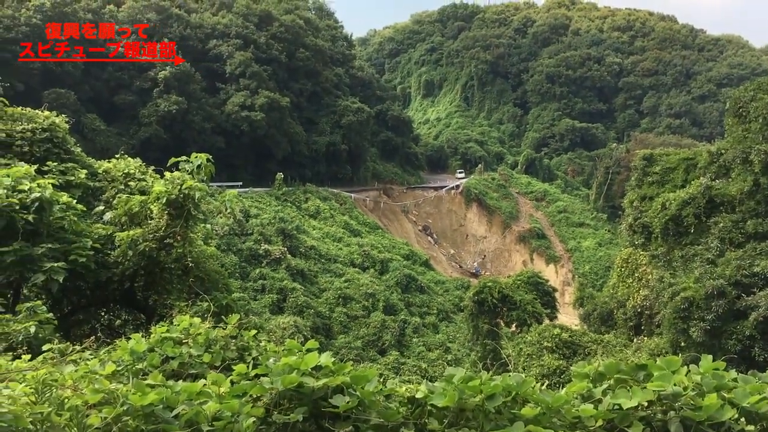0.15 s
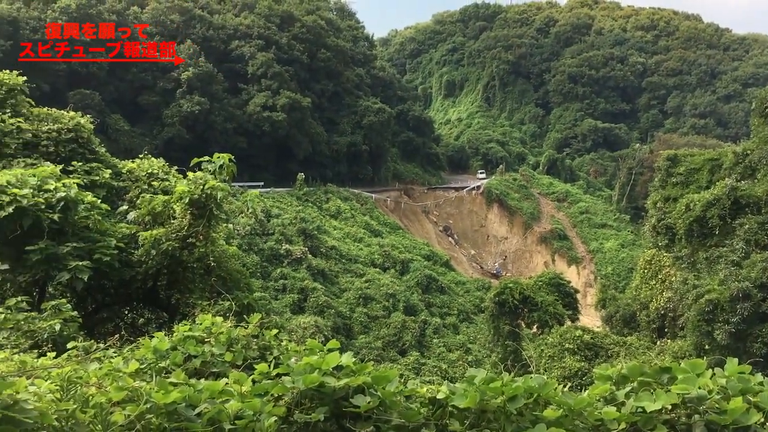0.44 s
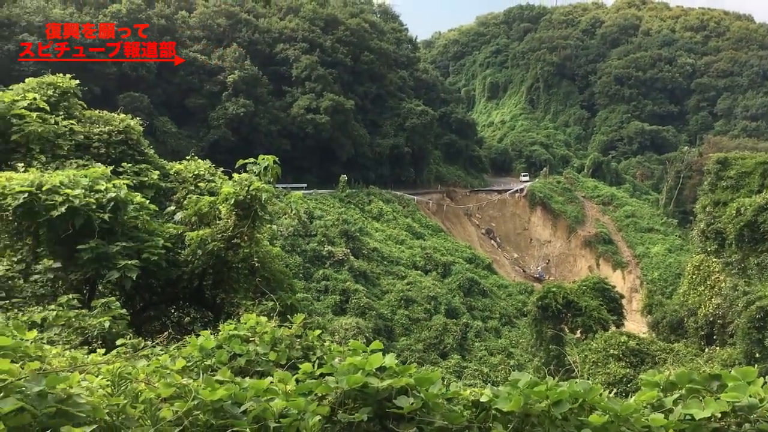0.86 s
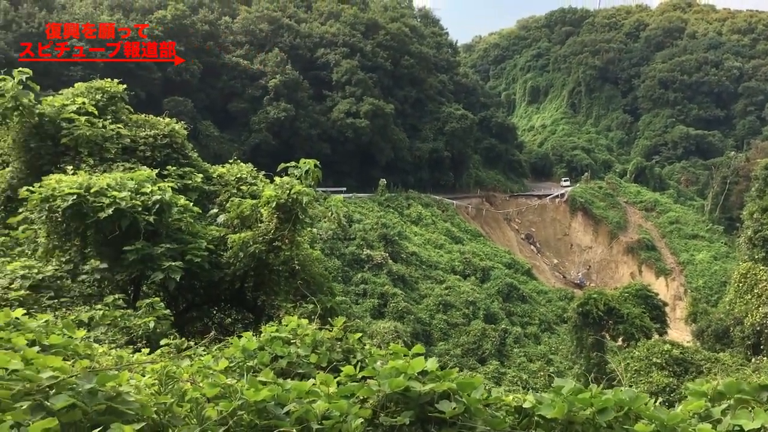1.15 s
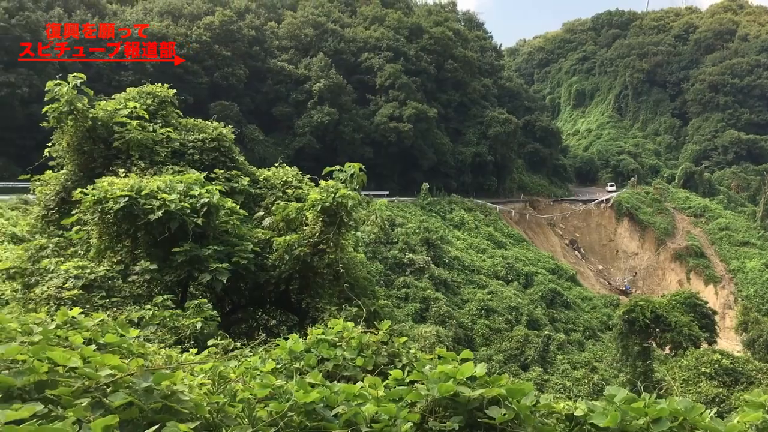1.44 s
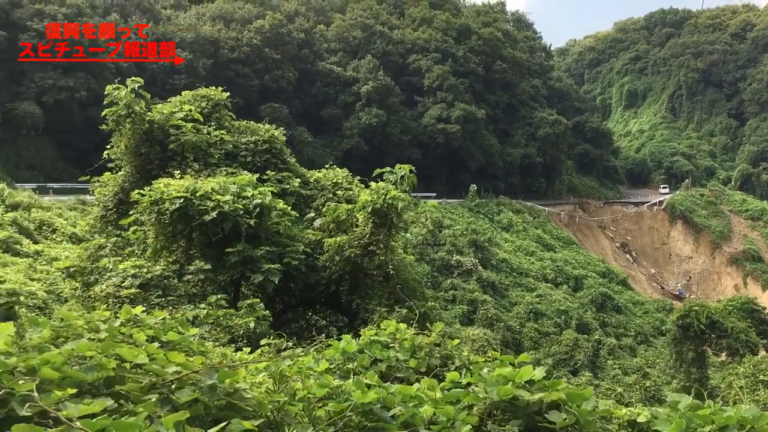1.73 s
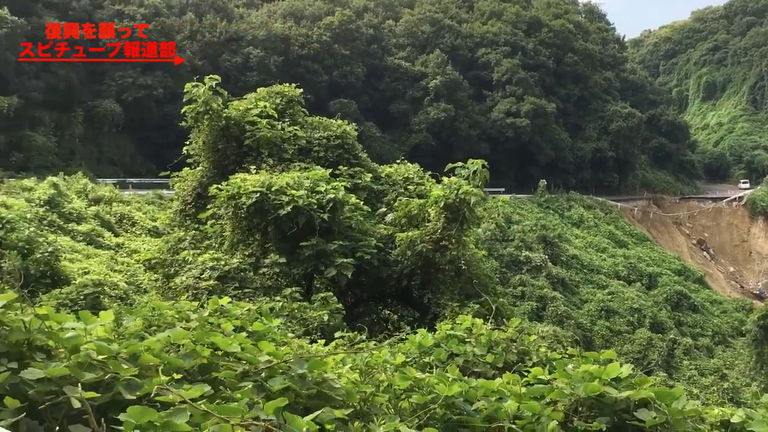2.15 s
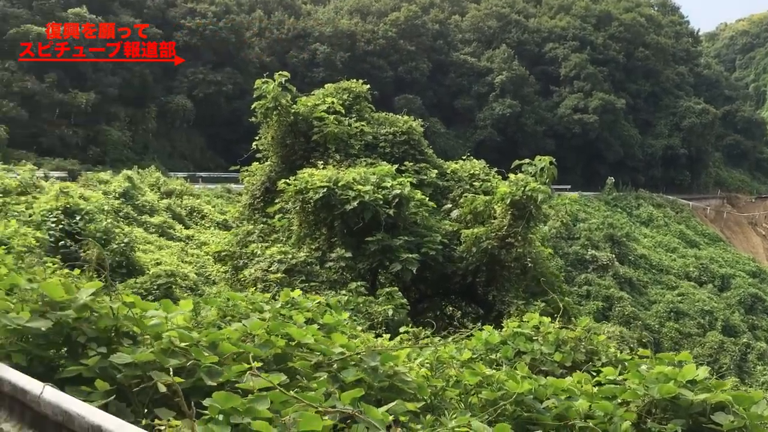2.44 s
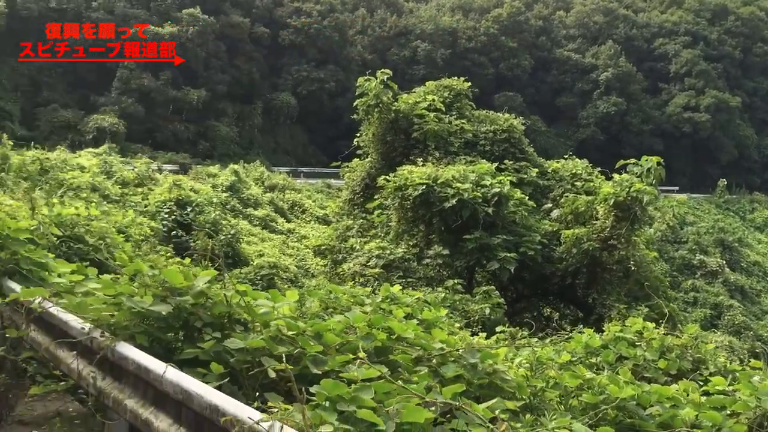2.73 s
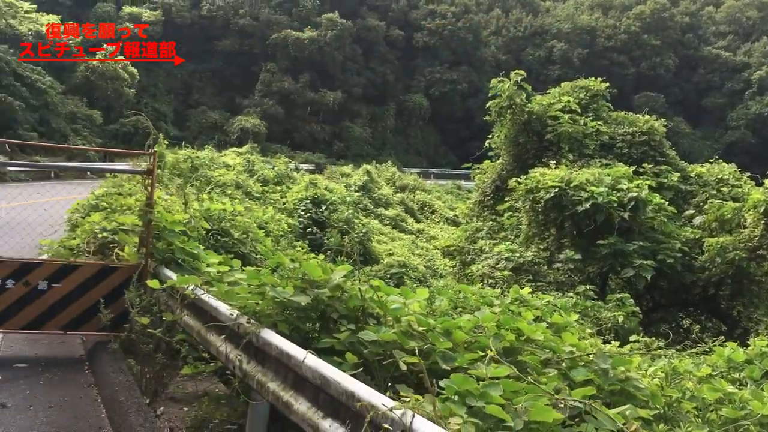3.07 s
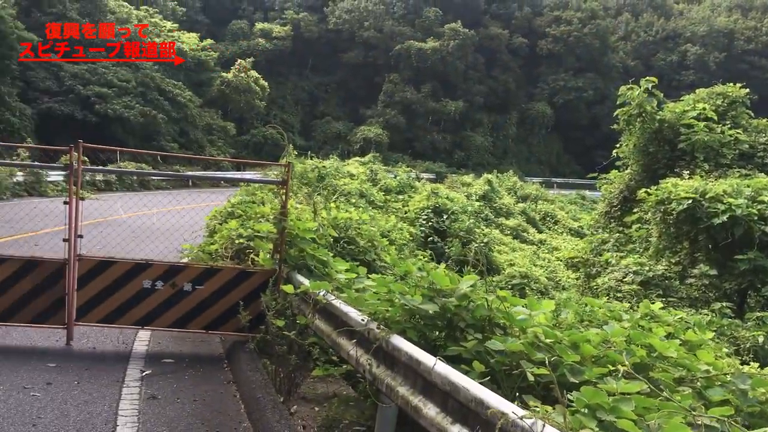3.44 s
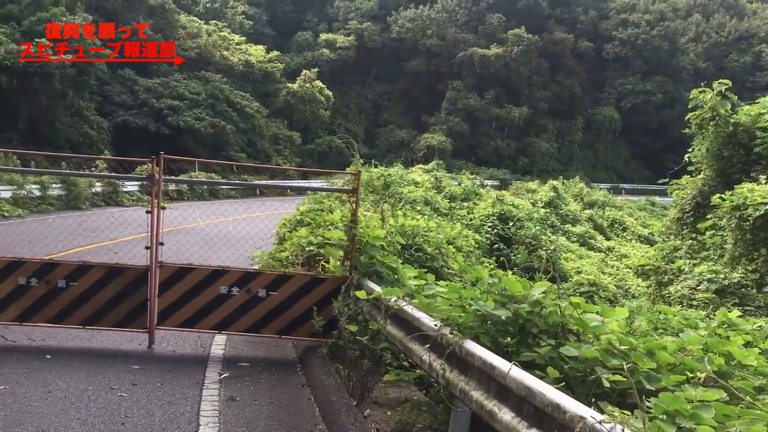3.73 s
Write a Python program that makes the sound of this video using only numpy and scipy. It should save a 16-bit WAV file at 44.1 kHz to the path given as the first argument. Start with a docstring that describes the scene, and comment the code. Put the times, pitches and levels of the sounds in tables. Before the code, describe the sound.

A cicada chorus sizzles continuously outdoors among trees, with thin whines and tiny chirps inside it. A closer singer swells in the second half, while faint taps occur near the single microphone above a weak rumble.

```python
"""Cicadas on a wooded hillside

Many far singers blur into a bright hiss, one near singer buzzes through it, and a few whine. Brief chirps fleck
a deeper wash, higher-pitched insects swell in waves, and below lie a low rumble, a faint hum and soft taps.
The singers are click trains, smeared by echoes or ringing a small body; whines and hum are narrow-band noise,
the rumble is filtered noise, chirps are rising sines, and taps are damped sines. One microphone hears it all."""
import sys
import numpy as np
from scipy import signal
from scipy.fft import rfft, irfft
from scipy.io import wavfile

SR = 44100
rng = np.random.default_rng(int(sys.argv[2]) if len(sys.argv) > 2 else 0)


def wrap_up_sound(samples):
    """Save the sound to the file named by the first command line argument, as 16-bit audio."""
    columns = np.atleast_2d(samples).T
    # keep every value between -1 and 1, then stretch to whole-number steps
    tamed = np.clip(columns, -1, 1)
    steps = np.round(tamed * 32767).astype(np.int16)
    wavfile.write(sys.argv[1], SR, steps)


N = 171990
CHORUS_CLICKS_PER_S = 480   # mean rate in the far chorus and the deeper wash


def amp(db):
    """Level law: a gain is ten to the power of decibels over twenty."""
    return 10 ** (np.asarray(db) / 20)


def rms_one(x):
    """Normalisation: division by the root mean square gives unit rms."""
    return x / np.sqrt(np.mean(np.abs(x) ** 2) + 1e-20)


def level(rows):
    """Amplitude envelope: gain over time, with decibels interpolated between (time_s, level_db) rows."""
    time_s, level_db = np.transpose(rows)
    return amp(np.interp(np.arange(N) / SR, time_s, level_db))


def colour(x, spectrum):
    """Linear filtering: weight each frequency by the tabled curve, almost nothing outside it; rms 1."""
    curve_hz, curve_db = np.transpose(spectrum)
    freq_hz = np.arange(len(x) // 2 + 1) * SR / len(x) + 1e-3   # the offset avoids log(0)
    gain_db = np.interp(np.log(freq_hz), np.log(curve_hz), curve_db, left=-99, right=-99)
    return rms_one(irfft(rfft(x) * amp(gain_db), len(x))[:N])


def slow(width_hz):
    """Narrow-band noise: a two-pole resonance at zero frequency smooths complex noise; rms 1."""
    pole = np.exp(-np.pi * width_hz / SR)
    noise = rng.standard_normal(N + SR) + 1j * rng.standard_normal(N + SR)
    smooth = signal.lfilter([1], [1, -2 * pole, pole * pole], noise)
    return rms_one(smooth[SR:])   # the filter settles during the discarded first second


def rings(start_s, gain, hz, t60_s):
    """Damped oscillation: each strike starts a sine that falls by 60 dB in t60_s."""
    start = np.floor(start_s * SR).astype(int)
    out = np.zeros(N + SR)
    span = np.arange(1, int(t60_s * SR) + 2)
    index = start[:, None] + span
    since_s = index / SR - start_s[:, None]   # keeps strike times finer than one sample
    ring = np.sin(2 * np.pi * hz * since_s) * amp(-60 * since_s / t60_s)
    np.add.at(out, index, gain[:, None] * ring)
    return out[:N]


def crowd(clicks_per_s, spectrum, throb_db, throb_hz, count):
    """Incoherent superposition: ragged click trains, each with its own pitch region, throb and echo path."""
    rate_spread = .12    # between singers, share of the mean rate
    woods_t60_s = .12    # blur of echoes among the trees
    echo_s = np.arange(SR // 2) / SR
    freq_hz = np.arange(1, N // 2 + 2) * SR / N
    edges_hz = [spectrum[1][0], spectrum[-2][0]]
    place = count * np.interp(np.log(freq_hz), np.log(edges_hz), [0, 1])   # position along the pitch regions
    total = 0
    for k in range(count + 1):
        rate = clicks_per_s * (1 + rate_spread * rng.standard_normal())
        throb = amp(throb_db * slow(throb_hz).real)
        clicks = (rng.random(N) < rate / SR) * throb
        echoes = rng.standard_normal(len(echo_s)) * amp(-60 * echo_s / woods_t60_s)
        path = rfft(echoes, N)
        smear = path / np.abs(path)   # phase alone: echoes smear but do not colour
        region = np.cos(np.pi / 2 * np.clip((place - k) / 2, -1, 1))   # overlaps its neighbours
        total = total + rfft(rms_one(clicks)) * smear * region
    return colour(irfft(total, N), spectrum)


def rumble():
    """Filtered broadband noise: a low-pitched spectrum, as of far wind or traffic."""
    # Rumble spectrum: freq_hz [Hz], density_db [dB per Hz, relative]
    rumble_spectrum = [(16, -38), (28, -3.5), (49, 0.5), (70, 2.5), (173, -11), (241, -10.5), (475, -22.5),
                       (692, -24.5), (785, -27.5), (1200, -37), (1560, -36), (2640, -120)]
    return amp(-62) * colour(rng.standard_normal(N), rumble_spectrum)


def hum():
    """Amplitude and phase modulation: slow complex noise makes each faint tone waver."""
    # Hum tones: pitch_hz [Hz], level_db [dB, rms of the complex tone; its real part lies about 3 dB lower]
    hum_tones = [(237, -83), (708, -90)]
    width_hz = 3.8
    t = np.arange(N) / SR
    out = 0
    for pitch_hz, level_db in hum_tones:
        tone = np.exp(2j * np.pi * pitch_hz * t)
        out = out + amp(level_db) * (slow(width_hz) * tone).real
    return out


def taps():
    """Impulse response of damped modes: soft hollow taps near the microphone, a short ring over a duller thud."""
    # Taps: start_s [s], level_db [dB, ring amplitude before decay], pitch_hz [Hz], t60_s [s]
    tap_rows = [(1.030, -54, 960, .035), (2.335, -58, 1100, .008), (2.345, -63, 880, .04),
                (2.401, -58, 950, .008), (2.776, -57, 950, .008), (3.009, -54, 1280, .03),
                (3.132, -58, 1250, .01), (3.184, -54, 1080, .012), (3.299, -50, 1010, .016)]
    thud_hz, thud_t60_s, thud_db = 650, 0.0092, -6.5   # thud level is relative to the ring
    out = 0
    for start_s, level_db, pitch_hz, t60_s in tap_rows:
        start = np.array([start_s])
        ring = rings(start, amp([level_db]), pitch_hz, t60_s)
        thud = rings(start, amp([level_db + thud_db]), thud_hz, thud_t60_s)
        out = out + ring + thud
    return out


def deep_wash():
    """Superposed click trains in a lower band: probably larger singers further off."""
    # Wash spectrum: freq_hz [Hz], density_db [dB per Hz, relative]
    wash_spectrum = [(530, -47), (900, -23.5), (1180, -20), (1460, -4), (1740, -0.5), (2320, 0), (2930, -6),
                     (3910, -4), (4800, -10), (5200, -11.5), (6760, -29), (11400, -120)]
    # Wash envelope: time_s [s], level_db [dB, rms]
    wash_level = [(0.0, -52), (0.44, -55), (0.51, -52), (0.81, -54.5), (1.05, -53), (2.3, -53), (2.39, -54),
                  (2.43, -52), (3.42, -52.5), (3.9, -51)]
    wash = crowd(CHORUS_CLICKS_PER_S, wash_spectrum, throb_db=2.5, throb_hz=10.1, count=20)
    return level(wash_level) * wash


def flecks():
    """Frequency sweep: brief rising chirps scattered through the deeper wash, like trickling water."""
    # Clearest flecks: centre_s [s], pitch_hz [Hz, at the centre], level_db [dB, peak]
    clear_flecks = [(.55, 2080, -54), (.618, 2600, -54), (.878, 2150, -53), (1.65, 1880, -55),
                    (3.1, 2100, -55)]
    per_s, length_s = 40, .04
    loudest_db, range_db = -60, 10   # random flecks lie up to range_db below the loudest
    low_hz, high_hz = 1460, 2712     # centre pitches of the random flecks
    rise = 0.105                     # sweep either side of the centre pitch, share
    draw = rng.random((400, 3))
    random_s = np.cumsum(-np.log(1 - draw[:, 0])) / per_s   # exponential waits between flecks
    random_hz = low_hz * (high_hz / low_hz) ** draw[:, 1]
    random_db = loudest_db - range_db * draw[:, 2]
    random_flecks = np.transpose([random_s, random_hz, random_db])[random_s < N / SR]
    out = np.zeros(N + SR)
    u = np.linspace(-1, 1, int(length_s * SR))   # from start to end of one fleck
    for centre_s, pitch_hz, level_db in np.vstack([clear_flecks, random_flecks]):
        start = max(int(centre_s * SR) - len(u) // 2, 0)
        phase = 2 * np.pi * np.cumsum(pitch_hz * (1 + rise * u)) / SR
        out[start:start + len(u)] += amp(level_db) * (1 - u ** 2) ** 2 * np.sin(phase)
    return out[:N]


def high_insects():
    """Superposition under a moving envelope: higher-pitched click trains swell in waves."""
    # High spectrum: freq_hz [Hz], density_db [dB per Hz, relative]
    high_spectrum = [(9500, -29), (10700, -9.5), (11500, -1.5), (13000, 1), (14500, 0), (15800, -1),
                     (17000, 3.5)]
    # Swells: time_s [s], level_db [dB, rms]
    high_level = [(0.0, -54), (0.29, -54), (0.49, -56.5), (0.59, -55), (0.6, -52.5), (0.79, -55),
                  (1.93, -52.5), (1.95, -55), (2.57, -56), (2.83, -52.5), (2.94, -57), (3.14, -54),
                  (3.24, -57), (3.36, -54.5), (3.58, -58), (3.63, -54), (3.89, -54), (3.9, -54)]
    return level(high_level) * crowd(300, high_spectrum, throb_db=-2.0, throb_hz=6.0, count=10)


def whines():
    """Frequency-shifted narrow-band noise: rough tones glide slowly, most of them upward."""
    # Whines: start_s [s], end_s [s], from_hz [Hz], to_hz [Hz],
    # level_db [dB, rms of the complex tone before fades; its real part lies about 3 dB lower]
    whine_rows = [(.1, 1.9, 5580, 5780, -60), (1.7, 3.6, 5850, 6060, -55), (.4, 1.5, 6680, 6980, -56),
                  (1.4, 2.8, 6930, 6900, -59), (1.15, 2.0, 6280, 6340, -55), (0, .9, 4800, 4650, -66)]
    width_hz, fade_s = 90, .2
    t = np.arange(N) / SR
    out = 0
    for start_s, end_s, from_hz, to_hz, level_db in whine_rows:
        pitch_hz = np.interp(t, [start_s, end_s], [from_hz, to_hz])
        phase = 2 * np.pi * np.cumsum(pitch_hz) / SR
        fade = np.clip(np.minimum(t - start_s, end_s - t) / fade_s, 0, 1)
        tone = (slow(width_hz) * np.exp(1j * phase)).real
        out = out + amp(level_db) * fade * tone
    return out


def near_singer():
    """Forced resonance: four ribs buckle in turn, and their nearly steady clicks ring the drum."""
    # Near singer's envelope: time_s [s], level_db [dB, on a song of unit rms]
    near_level = [(0, -54), (1.0, -59.5), (1.8, -49), (2.3, -47.5), (3.0, -44.5), (3.5, -41.5), (3.9, -41)]
    # Ribs: lag_us [microseconds from an even beat], level_db [dB, relative]
    ribs = [(0, 0), (-8, -.6), (-14, -1.5), (-6, -1.1)]
    # Drum modes of the body: pitch_hz [Hz], level_db [dB, relative], t60_s [s]
    drum_modes = [(8230, 33, 0.0064), (7400, -25, 0.002)]
    clicks_per_s = 492.7
    jitter_us, uneven_db = 12, 2.5     # click-to-click deviations
    wander_us, wander_hz = 44, 40      # scale and bandwidth of a slower timing drift
    k = np.arange(int(N / SR * clicks_per_s))
    lag_us, rib_db = np.array(ribs)[k % len(ribs)].T
    chance = rng.standard_normal((len(k), 2))
    drift_us = wander_us * slow(wander_hz).real[k * (N // len(k))]   # read about once per click
    click_s = (k + 1) / clicks_per_s + (lag_us + drift_us + jitter_us * chance[:, 0]) / 1e6
    gain = amp(rib_db + uneven_db * chance[:, 1])
    song = 0
    for pitch_hz, level_db, t60_s in drum_modes:
        song = song + amp(level_db) * rings(click_s, gain, pitch_hz, t60_s)
    small_body = signal.butter(4, [6000, 10000], "band", fs=SR, output="sos")   # radiates its own band only
    return level(near_level) * rms_one(signal.sosfilt(small_body, song))


def far_chorus():
    """Incoherent superposition: many far singers blur into the bright main band."""
    # Chorus spectrum: freq_hz [Hz], density_db [dB per Hz, relative]
    chorus_spectrum = [(2760, -36), (4700, -24.5), (5540, -13.5), (8420, 0), (9010, -2), (10600, -21),
                       (11000, -23), (14300, -52), (22000, -120)]
    # Chorus envelope: time_s [s], level_db [dB, rms]
    chorus_level = [(0, -40.5), (1, -41), (2, -40.5), (3, -40.5), (3.9, -41)]
    chorus = crowd(CHORUS_CLICKS_PER_S, chorus_spectrum, throb_db=1.5, throb_hz=13.0, count=20)
    return level(chorus_level) * chorus


def scene():
    """Linear superposition: all sources add at one microphone, whose signal fills both channels."""
    background = rumble() + hum() + taps()
    insects = deep_wash() + flecks() + high_insects() + whines() + near_singer() + far_chorus()
    return np.tile(background + insects, (2, 1))


def record(dry):
    """Band limiting: the microphone loses the deepest bass, and a steep low-pass cuts the top."""
    bass_loss = signal.butter(2, 37.4, "high", fs=SR, output="sos")      # corner in Hz
    top_cut = signal.ellip(14, .5, 52, 15720, fs=SR, output="sos")       # ripple dB, stopband dB, cutoff Hz
    mic = signal.sosfilt(bass_loss, dry)
    return signal.sosfilt(top_cut, mic)


dry = scene()
out = record(dry)
wrap_up_sound(out)
```